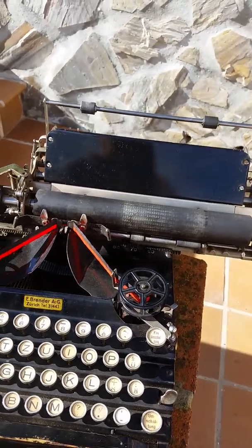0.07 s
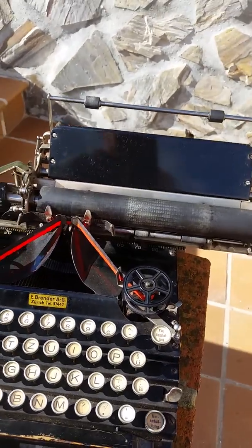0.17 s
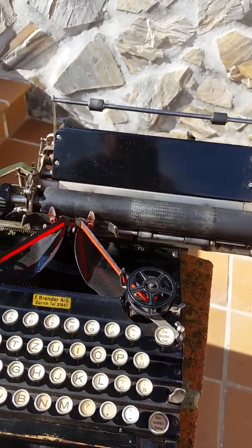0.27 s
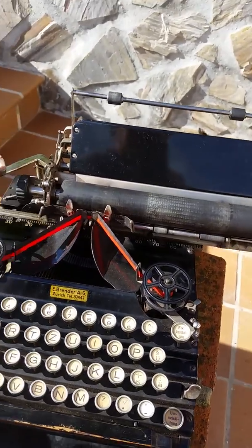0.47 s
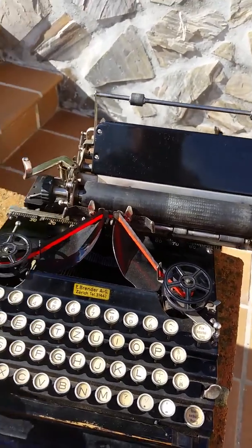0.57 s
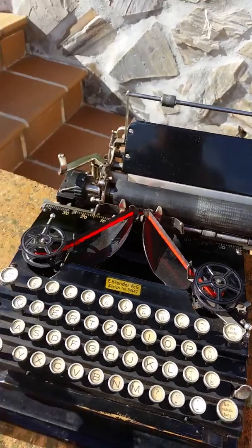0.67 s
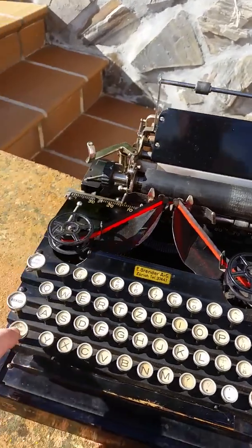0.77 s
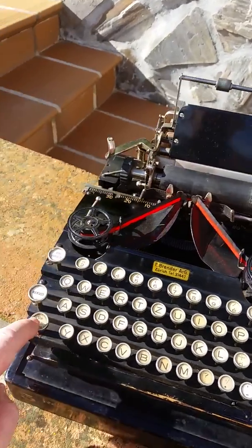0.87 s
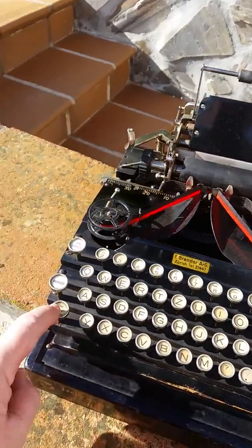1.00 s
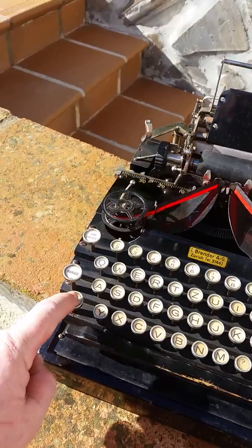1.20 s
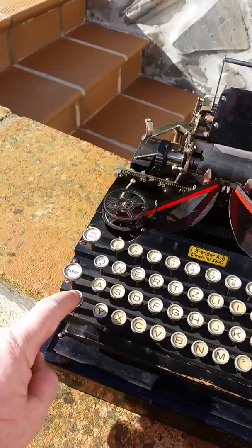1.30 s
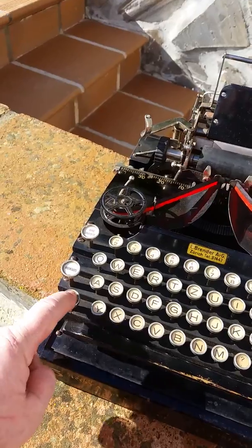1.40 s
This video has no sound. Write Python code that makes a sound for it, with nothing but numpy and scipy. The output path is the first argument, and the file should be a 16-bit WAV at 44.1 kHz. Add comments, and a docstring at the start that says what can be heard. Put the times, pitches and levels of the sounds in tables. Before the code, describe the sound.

Old manual typewriter, two hard metallic key clacks up close, each followed by a carriage slide

```python
"""An old manual typewriter, close to the microphone on an outdoor ledge: two keys are pressed.
Each clack is decaying noise for its many levers, plus sine waves for the steel frame and hollow base.
Short noise ticks of the linkage surround the clacks, and the carriage slides on with a rasp and thin squeal.
Behind it, shaped noise makes the answer of a stone wall, a low rumble, faint air and a high hiss band."""
import sys
import numpy as np
from scipy import signal
from scipy.fft import rfft, irfft, next_fast_len
from scipy.io import wavfile
from scipy.ndimage import map_coordinates

SR = 44100
rng = np.random.default_rng(int(sys.argv[2]) if len(sys.argv) > 2 else 0)


def int16_out(signal):
    """Quantize to a 16-bit WAV file."""
    q = np.round(np.clip(np.atleast_2d(signal).T, -1, 1) * 32767)
    wavfile.write(sys.argv[1], SR, q.astype(np.int16))


N = 63945  # length in samples

# The key clacks. Each row: start in seconds, level in dB, bass boost in dB, treble boost in dB,
# factor on the ringing times, left-minus-right level in dB.
KEY_CLACKS = [(0.2015, -24, 1, 1.5, 1.0, -1), (.7230, -30, 2.5, -0.5, 0.83, -0.5)]
# How alike steel noise is on both sides. Each row: frequency in Hz, likeness (1 is identical).
STEEL_LIKENESS = [(150, 0.97), (600, 1), (1200, 0.34), (4000, 0.45), (12000, 0.36)]
RATTLE_DB = 2  # strength of the quick flutter as loose levers chatter
MODE_SPREAD = 1.0  # radians of phase between the two microphones
LEFT_RIGHT = np.array([[.5], [-.5]])  # shares a difference between the two sides


def amp(db):
    """Turn decibels into a gain."""
    return 10 ** (np.asarray(db) / 20)


def unit(x):
    """Scale to an rms level of 1."""
    return x / np.sqrt(np.mean(x ** 2) + 1e-20)


def along(points, hz):
    """Read a curve of (Hz, value) points, joined on a logarithmic frequency axis."""
    f, v = np.transpose(points)
    return np.interp(np.log(hz + 1), np.log(f + 1), v)


def since(s):
    """Seconds since a moment, zero before it."""
    return np.maximum(np.arange(N) / SR - s, 0)


def fade(t, t60):
    """Exponential decay that falls by 60 dB in t60 seconds."""
    return np.exp(-np.log(1000) * t / np.maximum(t60, 1e-3))


def pan(db):
    """Left and right gains for a level difference; positive leans left."""
    g = amp(LEFT_RIGHT * db)
    return g / np.sqrt(np.mean(g ** 2, axis=0))


def wobble(rate):
    """A smooth random curve with this many random points a second."""
    points = rng.standard_normal(int(N * rate / SR) + 4)
    return map_coordinates(points, [np.arange(N) * rate / SR])


def filtered(x, response):
    """Multiply the spectrum of x by a response of frequency."""
    m = next_fast_len(N + SR // 2)
    return irfft(rfft(x, m) * response(np.fft.rfftfreq(m, 1 / SR)), m)[..., :N]


def noise(colour, alike):
    """Stereo noise of rms 1 with a given colour and left-right likeness."""
    def response(hz):
        turn = np.arccos(np.clip(along(alike, hz), -1, 1)) / 2
        return amp(along(colour, hz)) * [np.cos(turn), np.sin(turn)]

    mid, side = filtered(rng.standard_normal((2, N)), response)
    return unit(np.array([mid + side, mid - side]))


def dying(x, s, t60s, length=1):
    """From moment s on, each frequency of x dies at its own speed."""
    hz, t, z = signal.stft(x, SR, nperseg=256)
    decay = fade(np.maximum(t - s, 0), length * along(t60s, hz)[:, None])
    return signal.istft(z * decay, SR, nperseg=256)[1][:, :N]


def shelf(hz, corner_hz):
    """A gentle step: near one below the corner, near zero far above."""
    return 1 / (1 + (hz / corner_hz) ** 2)


def clacks():
    """A hard stop: a crack, the chattering ring of many levers, the frame's modes and the slower boom of the base."""
    # Each row: frequency in Hz, level in dB per Hz before scaling to rms 1.
    lever_colour = [(60, -34), (130, -21), (260, -6), (388, -9.5), (544, -1), (700, -6.5), (850, -2.5),
                    (1300, -9.5), (1900, -7.5), (3100, -13), (3990, -7.5), (5500, -14), (6200, -16.5),
                    (6650, -20.5), (7100, -14), (8800, -17), (10000, -13), (10800, -12.5), (12300, -5.5),
                    (15800, -11.5)]
    # Each row: frequency in Hz, ringing time (60 dB fall) in seconds before the length factor.
    lever_t60 = [(200, 0.25), (700, 0.27), (2000, 0.19), (5000, 0.2), (12000, 0.18)]
    # Each row: frequency in Hz, left-minus-right level in dB.
    steel_pan = [(150, -4), (550, 6.5), (1200, -4.5), (2200, 4), (4500, -2), (8000, 5.5), (13000, -6)]
    # Ringing modes of the steel frame. Each row: frequency in Hz, level in the first clack and in the
    # second in dB relative to that clack, ringing time in seconds before the length factor,
    # left-minus-right level in dB.
    frame_modes = [(576.5, -14, -3, 0.16, 7), (520, -20.5, -5.5, .12, 5), (834.6, -10, -17.5, 0.3, 8.5),
                   (932, -18.5, -21, .3, 5), (1074.3, -14, -13, 0.14, 0), (1164, -16, -25, 0.28, 3),
                   (1825, -17, -26, .11, 1), (3715, -22.5, -27, .13, -1), (4690, -19.5, -6.5, .1, -4.5),
                   (4884, -18, -16, .1, -4.5), (5090, -23.5, 0.5, 0.082, -9.5), (5456, -11, -18, .12, -4),
                   (7160, -22, -11, .11, -1.5), (8285, -22.5, -16, .12, -0.5), (10970, -14, -33, .1, -5),
                   (11625, -11, -21, .11, -6), (11822, -12.5, -21, .11, -5.5), (12170, -15, -29, .11, -7.5),
                   (12500, -10, -24, .11, -5.5)]
    # Boom of the hollow base. Each row: frequency it settles at in Hz, level in dB relative to the clack,
    # ringing time in seconds before the length factor.
    base_modes = [(139.5, -6.5, 0.62), (185.1, -8, 0.35)]
    crack_db, crack_t60 = -5, .014  # first contact, over the ring
    base_rise_s = 0.073  # before the length factor squared
    base_sag, base_sag_s = .12, .04  # the boom starts this share sharp and settles
    out = np.zeros((2, N))
    for k, (s, db, bass_db, treble_db, length, pan_db) in enumerate(KEY_CLACKS):
        t = since(s)

        def tone(hz):
            tilt_db = bass_db * shelf(hz, 900) + treble_db * (2.5 - shelf(hz, 7050))
            return pan(pan_db + along(steel_pan, hz)) * amp(tilt_db)

        levers = dying(filtered(noise(lever_colour, STEEL_LIKENESS), tone), s, lever_t60, length)
        crack = 1 + amp(crack_db) * fade(t, crack_t60)
        hit = amp(-1.5 + RATTLE_DB * wobble(450)) * levers * crack
        for hz, *levels, t60, mode_pan in frame_modes:
            # high modes reach the two sides further out of step
            spread = (1 - shelf(hz, 900)) * MODE_SPREAD * rng.choice([-1, 1]) * LEFT_RIGHT
            phase = 2 * np.pi * (hz * t + rng.random()) + .3 * wobble(90) + spread
            hit += pan(mode_pan) * amp(levels[k]) * fade(t, t60 * length) * np.sin(phase)
        for hz, level, t60 in base_modes:
            cycles = hz * (t + base_sag * base_sag_s * (1 - np.exp(-t / base_sag_s)))
            swell = 1 - np.exp(-t / (base_rise_s * length ** 2))
            hit += amp(level) * fade(t, t60 * length) * swell * np.sin(2 * np.pi * cycles)
        out += amp(db) * hit * (1 - np.exp(-t / .0004))
    return out


def ticks():
    """Small steel contacts of the linkage: short bursts of noise around each clack."""
    # Each row: start in seconds, level in dB, boost of the body below the treble in dB,
    # ringing time in seconds, left-minus-right level in dB.
    contacts = [(0.0907, -50, 7.5, 0.12, 5), (0.098, -39.5, -1.5, 0.056, -6.5),
                (0.1875, -46, 0.5, 0.099, -8), (.2122, -27.5, -2.5, .02, -0.5),
                (0.6958, -40.5, -9.5, 0.098, 0), (0.7222, -24.5, -9, 0.036, 8),
                (0.7375, -17, -16, 0.023, -25), (.7900, -42.5, 7, 0.018, -5)]
    # Each row: frequency in Hz, level in dB per Hz before scaling to rms 1.
    tick_colour = [(120, -29.5), (300, 2), (600, -2), (1100, 1), (1500, -11.5), (1850, -4), (2800, -7.5),
                   (4700, 3.5), (6300, -9.5), (7500, -8), (8500, -16), (10500, -2.5), (13000, -1),
                   (15800, 1.5)]
    out = np.zeros((2, N))
    for s, db, body_db, t60, pan_db in contacts:
        t = since(s)
        ring = filtered(noise(tick_colour, STEEL_LIKENESS), lambda hz: amp(body_db * shelf(hz, 5400)))
        shape = amp(RATTLE_DB * wobble(450)) * fade(t, t60) * (1 - np.exp(-t / .0004))
        out += amp(db) * pan(pan_db) * ring * shape
    return out


def thuds():
    """A low swell in the base as the finger pushes the key: a sine that rises and dies softly."""
    # Each row: start in seconds, pitch in Hz, peak level in dB, rise time in seconds.
    pushes = [(0.061, 103.3, -49.5, 0.046)]
    out = 0
    for s, hz, db, rise in pushes:
        t = since(s)
        swell = t / rise * np.exp(1 - t / rise)
        out = out + amp(db) * swell * np.sin(2 * np.pi * hz * t)
    return out


def carriage():
    """The carriage rasps along its rail; rubbed resonances grow into a squeal until it stops, then ring out."""
    # Each row: start in seconds, stop in seconds, rasp level at the start in dB,
    # squeal level in dB before the swell and the level of each resonance.
    slides = [(.255, .357, -45, -35.5), (.757, .795, -51.5, -50)]
    # Each row: frequency in Hz, level in dB per Hz before scaling to rms 1.
    rasp_colour = [(120, -27), (200, -7.5), (440, -11), (950, -12.5), (1790, -24), (2080, -10.5),
                   (2600, -21), (4310, -16), (6450, -30.5), (9000, -27.5), (15800, -28.5)]
    # Resonances rubbed by the slide. Each row: centre frequency in Hz, level in the first slide and in
    # the second in dB relative to that squeal, ringing time in seconds, left-minus-right level in dB.
    rubbed = [(2058, 0, -6, 0.21, -4), (2086, 0, -15, 0.17, 0.5), (1615, -16.5, 4.5, 0.18, 4),
              (940, -11, -6, 0.18, 1), (1130, -14.5, -6.5, 0.25, 1), (573.5, -13.5, -6.5, 0.62, 5.5)]
    rasp_t60, rasp_fall_db_per_s = 0.26, 60
    squeal_wander, squeal_swell_db = 0.0045, 5  # wander is a share of the pitch
    out = np.zeros((2, N))
    for k, (start, stop, rasp_db, ring_db) in enumerate(slides):
        t, after = since(start), since(stop)
        progress = np.clip(t / (stop - start), 0, 1)
        swell = amp(ring_db + squeal_swell_db * (progress - 2))
        rasp_gain = fade(after, rasp_t60) * amp(rasp_db - rasp_fall_db_per_s * t)
        slide = noise(rasp_colour, STEEL_LIKENESS) * rasp_gain
        slide *= amp(1.5 * wobble(250))  # roughness of the rasp
        for hz, *levels, t60, pan_db in rubbed:
            phase = 2 * np.pi * np.cumsum(hz * (1 + squeal_wander * wobble(70))) / SR
            gain = pan(pan_db) * swell * amp(levels[k] + wobble(67)) * fade(after, t60)
            slide += gain * np.sin(phase + MODE_SPREAD * LEFT_RIGHT)
        out += slide * (1 - np.exp(-t / 0.0027))
    return out


def echo():
    """The stone wall's answer to each clack: a faint, diffuse tail of noise whose pitches die at their own speeds."""
    # Each row: frequency in Hz, level in dB per Hz before scaling to rms 1.
    echo_colour = [(150, 1), (300, -2), (560, 7), (1000, 1.5), (2000, -7.5), (4000, -3.5), (6000, -14.5),
                   (8500, -24), (11000, -19), (14000, -12), (15800, -13.5)]
    # Each row: frequency in Hz, dying time (60 dB fall) in seconds.
    echo_t60 = [(200, 0.83), (600, 1.2), (2000, 1.3), (6000, .9), (14000, 1.23)]
    echo_db = -28  # relative to the clack
    out = 0
    for s, db, *_ in KEY_CLACKS:
        tail = dying(noise(echo_colour, [(200, .7), (2000, .25)]), s, echo_t60)
        out = out + amp(db + echo_db) * (1 - np.exp(-since(s) / .015)) * tail
    return out * pan(1.8)


def faint_noise():
    """Faint fluttering noise that rises before each clack and ends at it."""
    # Each row: start in seconds, stop in seconds, level in dB.
    stretches = [(.105, 0.204, -63.5), (0.649, 0.726, -64.5)]
    # Each row: frequency in Hz, level in dB per Hz before scaling to rms 1.
    noise_colour = [(300, -10), (1500, 0.5), (2500, -1.5), (4200, 3), (6500, -11), (8500, -14),
                    (11000, -5.5), (15800, 0.5)]
    rise_s = .02
    gate = 0
    for start, stop, db in stretches:
        gate = gate + amp(db) * (1 - np.exp(-since(start) / rise_s)) * fade(since(stop), .02)
    return gate * pan(-3.5) * noise(noise_colour, STEEL_LIKENESS) * amp(3.1 * wobble(150))


def outdoors():
    """Low rumble, thin air and a fluttering band of hiss to the left, all made from coloured noise."""
    # Colours of the rumble, the hiss and the air.
    # Each row: frequency in Hz, level in dB per Hz before scaling to rms 1.
    rumble_colour = [(12, -31.5), (20, -3.5), (65, -0.5), (126, -1.5), (221, -9.5), (345, -18),
                     (487, -21.5), (620, -24), (892, -29), (987, -31.5), (2500, -46.5), (3250, -72.5),
                     (5500, -120)]
    hiss_colour = [(2000, -31), (2800, -9.5), (3300, -14.5), (3700, 2.5), (3950, 3.5), (4250, -4.5),
                   (4900, -31), (7000, -41)]
    air_colour = [(300, 8.5), (1000, 1), (2500, -7), (5000, -8.5), (8000, -14.5), (13000, -7), (15800, -14)]
    # Slow course of the rumble. Each row: time in seconds, level in dB before a small wobble.
    rumble_level = [(0, -54.5), (.13, -51.5), (.3, -50.5), (.6, -52.5), (.8, -51), (1.0, -56.5),
                    (1.16, -54.5), (1.28, -58), (1.44, -59)]
    hiss_db, hiss_pan_db = -69, 13.5
    air_db, fall_db_per_s = -80.5, 5  # air and hiss both sink slowly
    level_db = np.interp(np.arange(N) / SR, *np.transpose(rumble_level))
    rumble = noise(rumble_colour, [(30, 0.21), (130, .8), (1000, 0.2)]) * amp(level_db + 0.62 * wobble(11))
    rumble = filtered(rumble, lambda hz: pan(along([(35, -3.5), (120, -1), (500, 1.5)], hz)))
    hiss = noise(hiss_colour, [(4000, 0.55)]) * pan(hiss_pan_db) * amp(hiss_db + 1.4 * wobble(140))
    air = amp(air_db) * noise(air_colour, [(1000, 0.401)])
    return rumble + (hiss + air) * amp(-fall_db_per_s * since(0))


def scene():
    """The typewriter, its echo, the faint noise before the clacks and the open air."""
    machine = clacks() + ticks() + thuds() + carriage()
    return machine + echo() + faint_noise() + outdoors()


def record(dry):
    """A very steep filter removes what lies above the band limit."""
    top_hz = 16000
    return filtered(dry, lambda hz: 1 / (1 + (hz / top_hz) ** 120))


dry = scene()
out = record(dry)
int16_out(out)
```